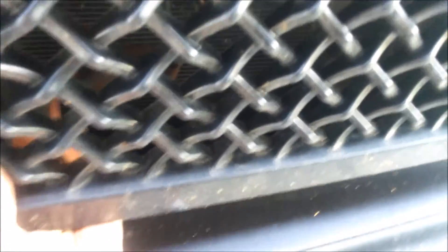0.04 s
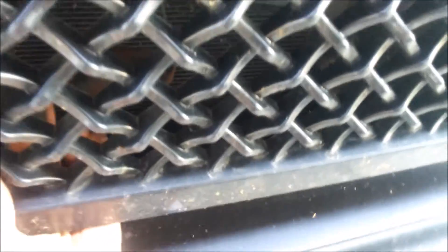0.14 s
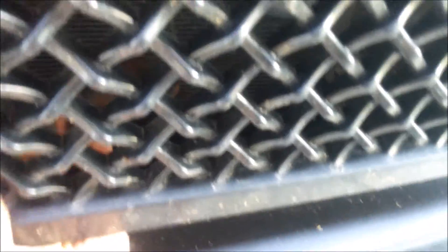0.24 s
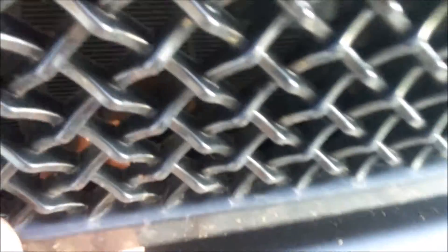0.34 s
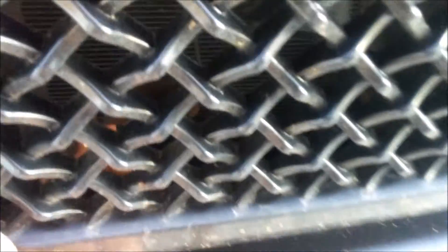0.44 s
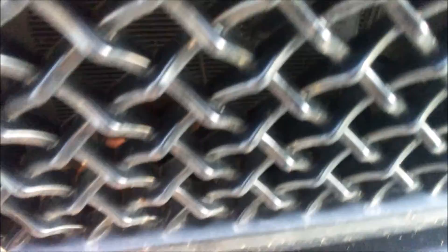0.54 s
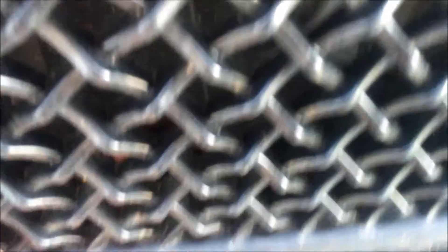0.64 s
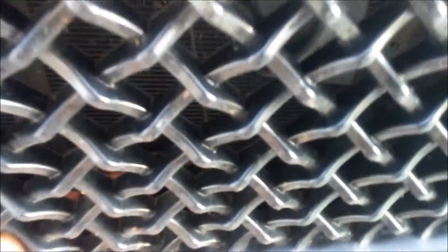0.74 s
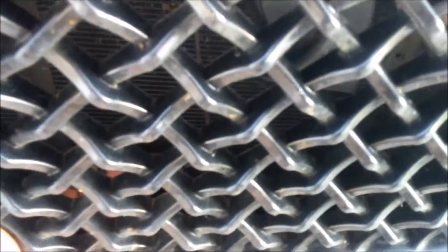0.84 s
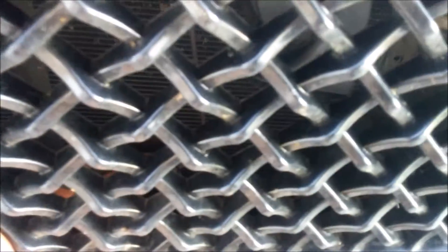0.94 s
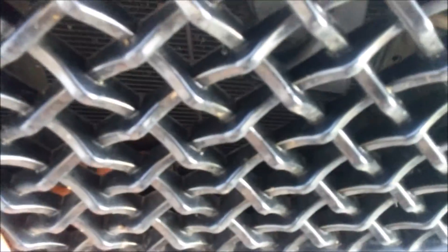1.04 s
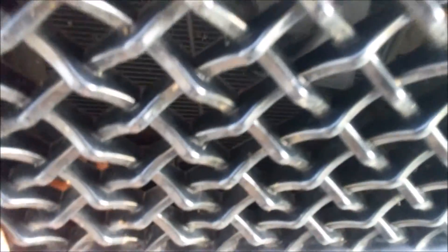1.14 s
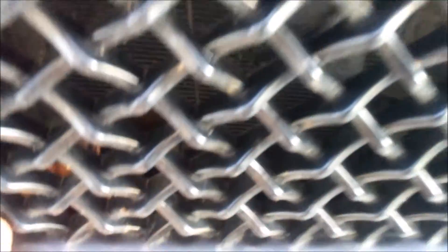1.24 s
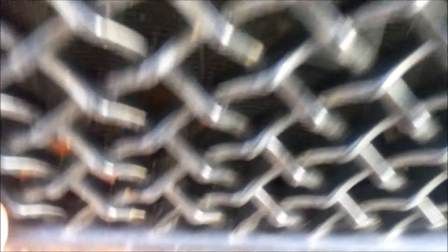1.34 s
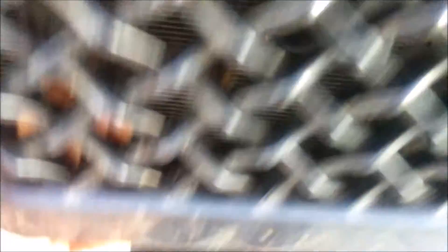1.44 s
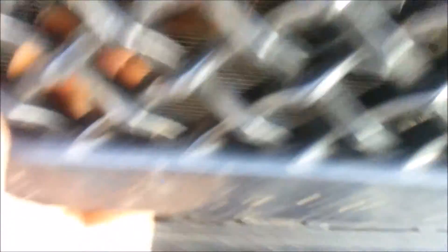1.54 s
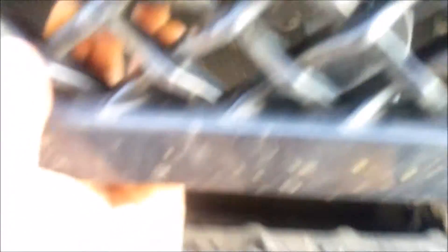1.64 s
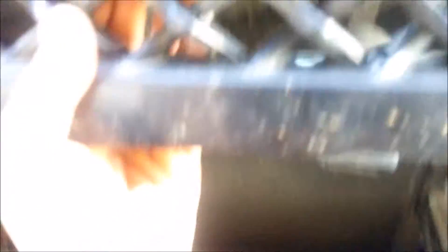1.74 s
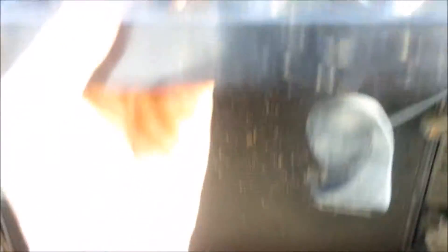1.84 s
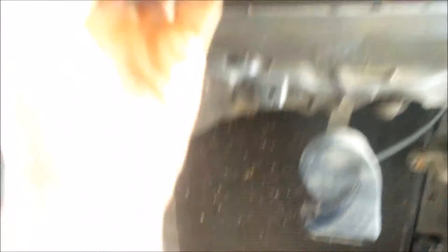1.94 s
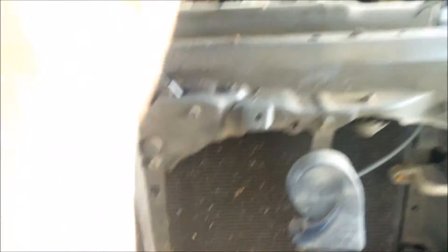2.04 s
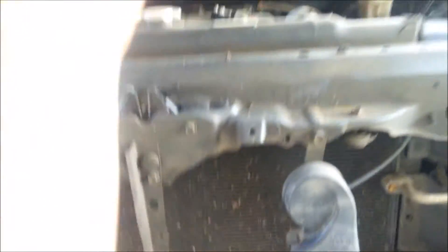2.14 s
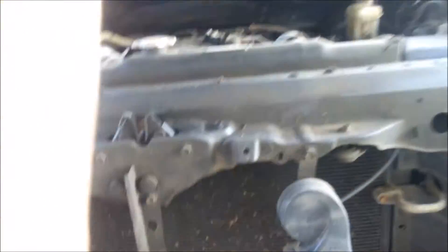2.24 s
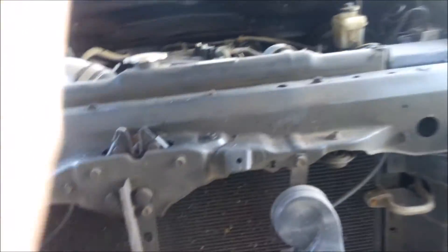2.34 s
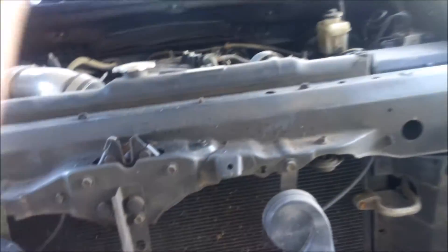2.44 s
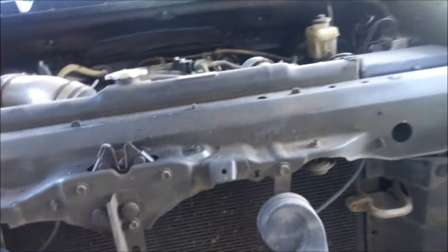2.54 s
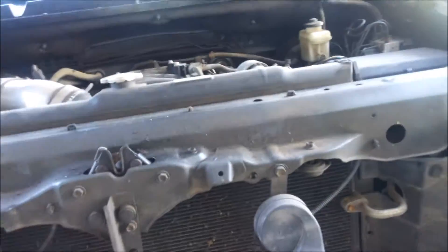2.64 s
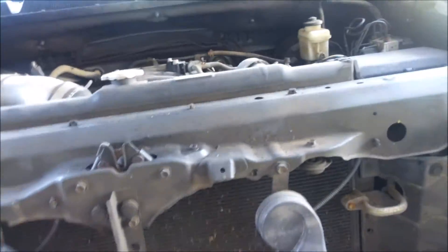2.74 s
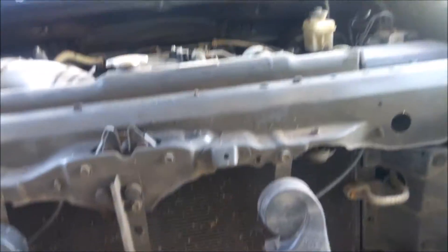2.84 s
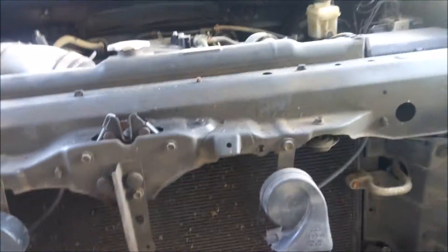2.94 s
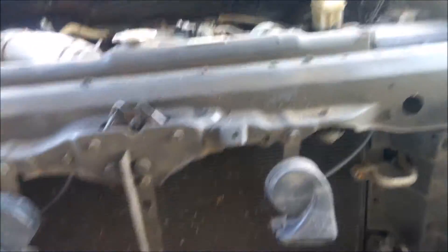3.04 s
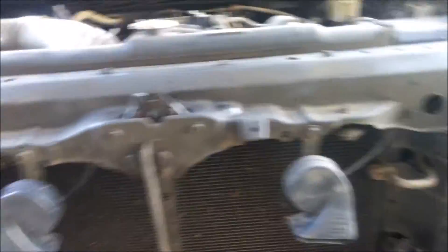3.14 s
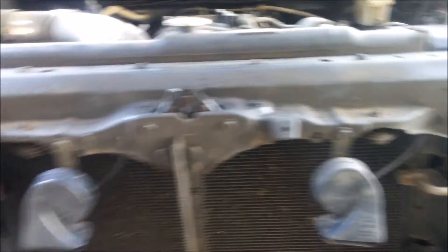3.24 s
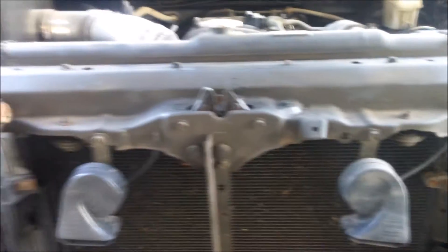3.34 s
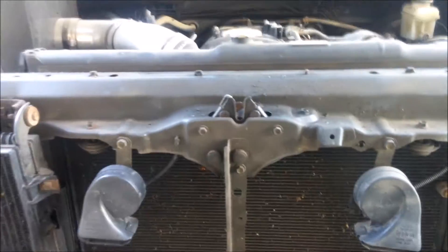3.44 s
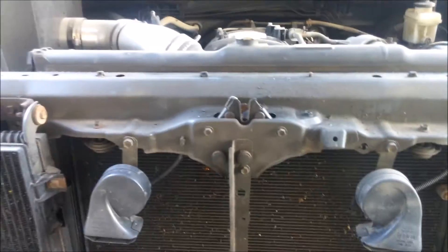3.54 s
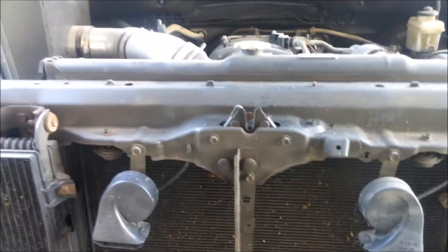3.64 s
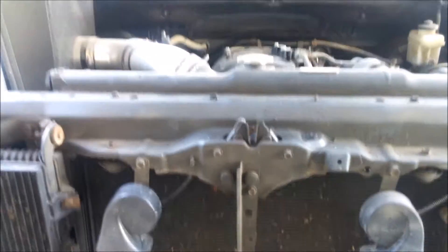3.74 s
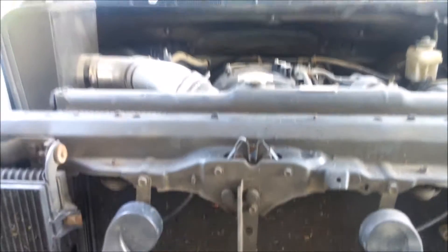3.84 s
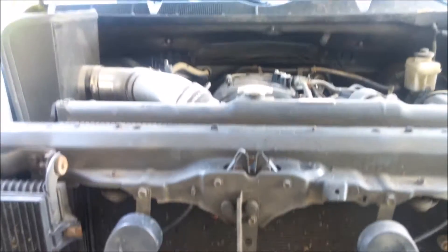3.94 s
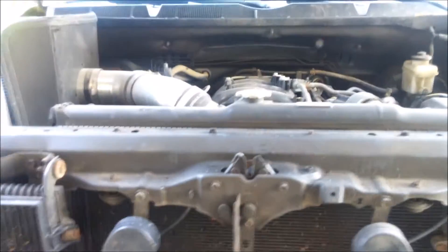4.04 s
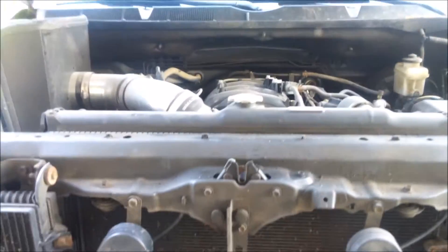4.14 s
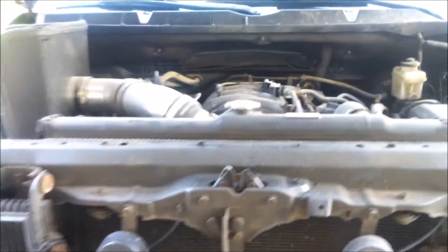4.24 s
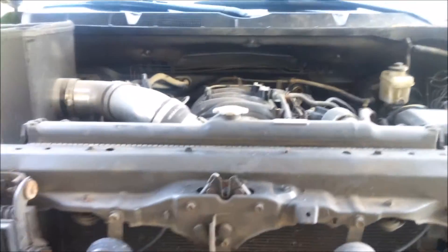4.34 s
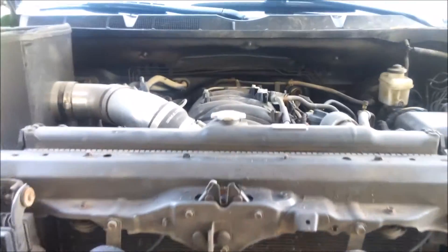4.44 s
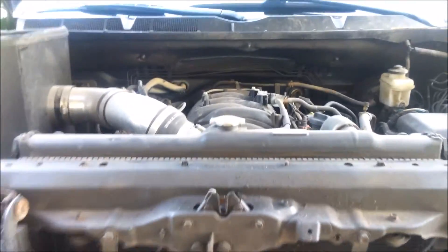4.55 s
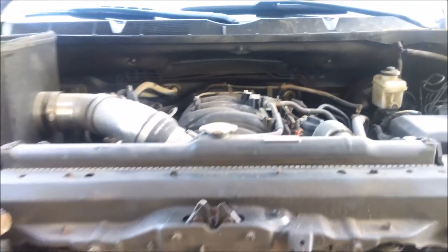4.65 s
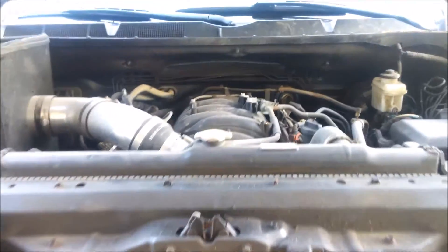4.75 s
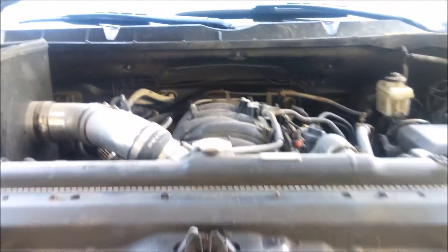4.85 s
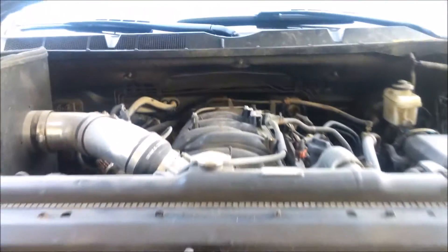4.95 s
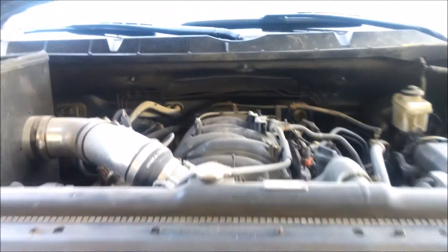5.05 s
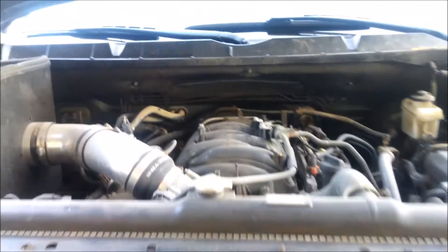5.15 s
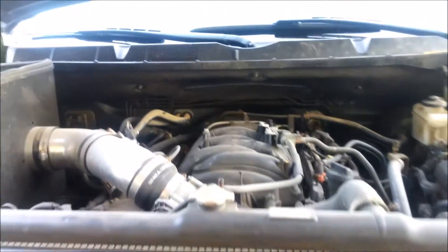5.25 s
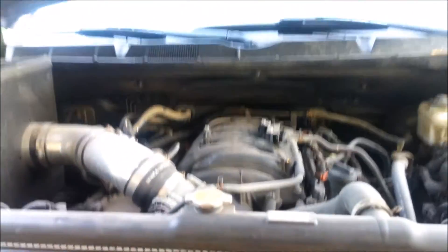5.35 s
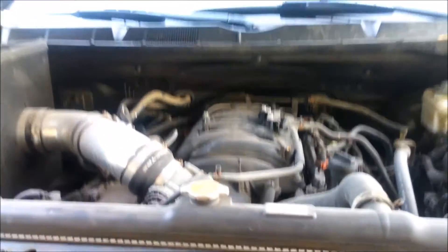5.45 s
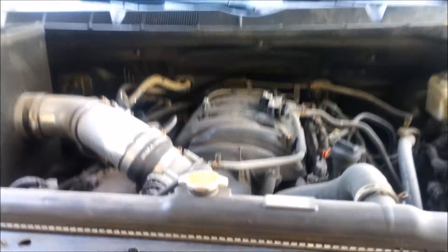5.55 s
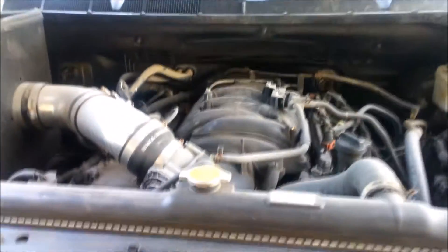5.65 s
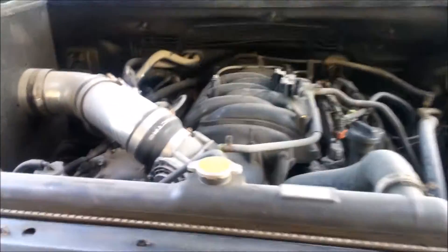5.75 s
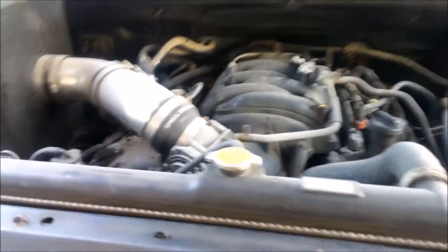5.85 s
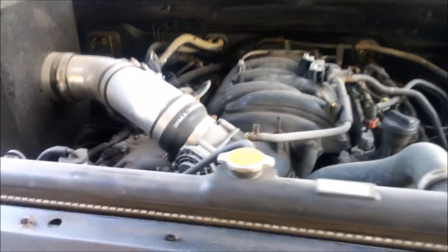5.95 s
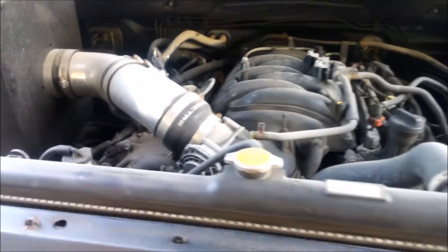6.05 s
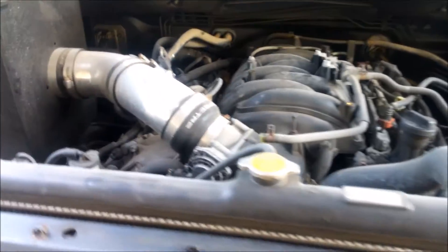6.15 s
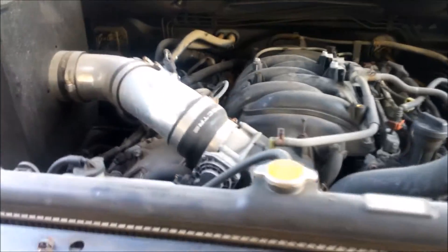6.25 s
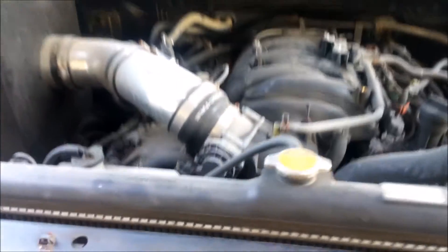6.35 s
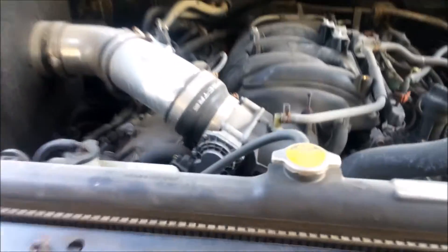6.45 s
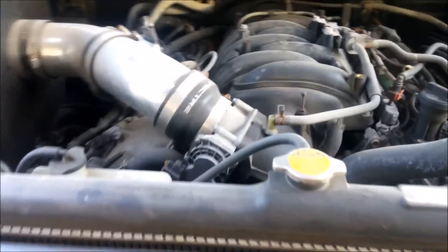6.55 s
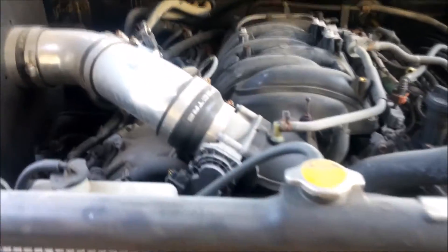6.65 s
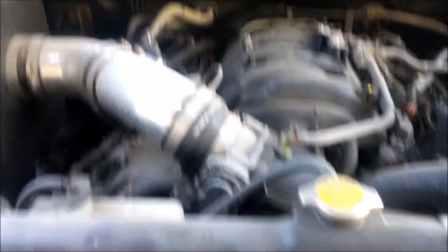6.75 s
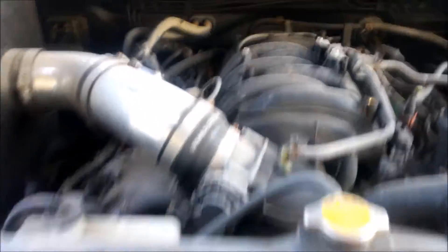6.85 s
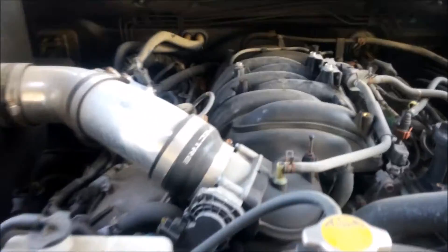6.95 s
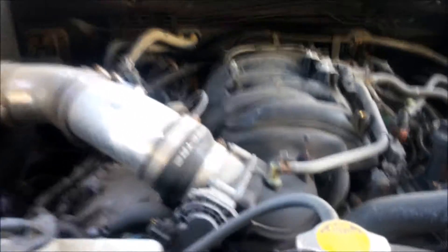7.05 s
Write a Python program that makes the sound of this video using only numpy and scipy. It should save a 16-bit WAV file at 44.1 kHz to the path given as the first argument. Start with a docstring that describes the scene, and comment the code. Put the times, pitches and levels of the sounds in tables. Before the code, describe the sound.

Small clicks and sliding steel at a hood catch, a couple of hollow thumps, then a sharp sheet-metal bang with boomy ringing. Scraping, squeals and airy hiss accompany the lift, easing into creaks and a final clunk. The sound then falls away to near silence, with rustling fingers, tiny sharp taps and far chirps, heard close on a hand-held phone outdoors.

```python
"""Outdoors, at the grille of a pickup: its hood is unlatched and lifted, heard from a hand-held phone.
The catch slides and knocks, the hood bangs free, groans and scrapes up on hissing struts and stops with a clunk;
then the hand on the phone, small ticks and far birds are left over a very quiet floor.
Blows and strain ring panel resonances; cracks, scrape, hiss, hand and floor are noise shaped in half-octave
bands; whistle is resonated noise, ticks are resonated clicks; squeaks and birds are gliding, wandering tones."""
import sys
import numpy as np
from scipy import signal
from scipy.io import wavfile

SR = 44100
rng = np.random.default_rng(int(sys.argv[2]) if len(sys.argv) > 2 else 0)


def to_wav(s):
    """Save 16-bit WAV."""
    ch = np.atleast_2d(s).T  # columns
    pcm = np.round(np.clip(ch, -1, 1) * 32767)  # PCM
    wavfile.write(sys.argv[1], SR, pcm.astype(np.int16))


N = 313551

EDGES_HZ = 25 * 2 ** np.arange(0, 9.6, .5)   # half-octave band edges
# dull rub spectrum, of groaning hood and hand: (frequency [Hz], density [dB per Hz, relative])
RUB_SHAPE = [(40, -12.5), (150, -11), (380, 4.5), (800, -16.5), (2000, -33.5)]
# metal scrape spectrum: (frequency [Hz], density [dB per Hz, relative])
SCRAPE_SHAPE = [(40, -42), (300, -8.5), (700, -6), (1200, -0.5), (2200, 0), (3400, -6), (6000, -18),
                (15000, -48.5)]


def amp(db):
    """Gain of a level in dB."""
    return 10 ** (np.asarray(db) / 20)


def rms_one(x):
    """Scaled to rms 1."""
    return x / np.sqrt(np.mean(x ** 2) + 1e-20)


def summed_db(levels):
    """Level of unrelated sounds heard together."""
    return 10 * np.log10(sum(amp(2 * db) for db in levels))


def in_time(rows):
    """Level of a (time, level) curve at every sample."""
    s, db = np.transpose(rows)
    return np.interp(np.arange(N) / SR, s, db)


def at_hz(points, hz):
    """A spectrum read on a log-frequency axis."""
    points_hz, values = np.transpose(points)
    return np.interp(np.log(hz), np.log(points_hz), values)


def drift(rate_hz):
    """Slow random signal of rms 1: noise at SR / 40 through two equal low-pass poles."""
    r = np.exp(-80 * np.pi * rate_hz / SR)
    white = rng.standard_normal(N // 40 + 2002)
    slow = signal.lfilter([1], [1, -2 * r, r * r], white)[2000:]
    return np.interp(np.arange(N) / 40, np.arange(len(slow)), rms_one(slow))


def resonance(x, hz, width_hz):
    """Two-pole peak of gain about 1."""
    r = np.exp(-np.pi * width_hz / SR)
    gain = (1 - r * r) / 2
    poles = [1, -2 * r * np.cos(2 * np.pi * hz / SR), r * r]
    return signal.lfilter([gain, 0, -gain], poles, x + 1e-18)


def placed(mid, side, alike, pan_db):
    """Left and right from two unrelated signals; positive pan is louder left."""
    alike = np.clip(alike, 0, 1)
    sign = np.array([[1], [-1]])
    pair = np.sqrt(1 + alike) * mid + sign * np.sqrt(1 - alike) * side
    return pair * amp(sign * pan_db / 2) / np.sqrt(2)


def on_truck(pair, hz):
    """Truck sounds are alike in the bass, lean left there and right in the treble around 6 kHz."""
    # (frequency [Hz], left-right likeness [0-1, clipped])
    likeness = [(60, 0.9), (180, 0.98), (550, 0.85), (1650, 0), (4970, 0.09), (15000, -5.5)]
    # (frequency [Hz], left over right [dB])
    tilt = [(60, 1), (150, 2), (380, 2), (950, 0.5), (2380, -4), (5980, -9), (15000, 2)]
    return placed(*pair, at_hz(likeness, hz), at_hz(tilt, hz))


def bands():
    """Half-octave bands of two unrelated noises, each with its centre."""
    white = rng.standard_normal((2, 2, N))
    for k, (low, high) in enumerate(zip(EDGES_HZ, EDGES_HZ[1:])):
        sos = signal.butter(2, [low, high], "band", fs=SR, output="sos")
        yield np.sqrt(low * high), signal.sosfilt(sos, white[k % 2])


def unit(spectrum, hz):
    """Band gain that gives a spectrum a total rms of 1."""
    centres = np.sqrt(EDGES_HZ[1:] * EDGES_HZ[:-1])
    total = np.sum(amp(at_hz(spectrum, centres)) ** 2 * np.diff(EDGES_HZ)) / (SR / 2)
    return amp(at_hz(spectrum, hz)) / np.sqrt(total)


def grains(per_s, spread_db):
    """Two unrelated streams of clicks of uneven size at shared random moments, rms 1."""
    size_db = spread_db * np.minimum(rng.exponential(1, (2, N)), 5)
    sizes = amp(size_db) * rng.standard_normal((2, N))
    return rms_one(sizes * (rng.random(N) < per_s / SR))


def tones(notes, blur, lean_db):
    """Gliding narrow tones whose strength and phase wander; blur is their width as a share of pitch."""
    out = np.zeros((2, N))
    lean = np.array([[lean_db], [-lean_db]]) / 2
    for s, length_s, start_hz, end_hz, db in notes:
        n, i = round(length_s * SR), round(s * SR)
        r = np.exp(-np.pi * blur * start_hz / SR)
        wander = rng.standard_normal((2, n + 4000)) + 1j * rng.standard_normal((2, n + 4000))
        wander = signal.lfilter([1], [1, -2 * r, r * r], wander)[:, -n:]
        phase = 2 * np.pi * np.cumsum(np.linspace(start_hz, end_hz, n)) / SR
        note = rms_one(np.real(wander * np.exp(1j * phase)))
        envelope = signal.windows.tukey(n, .55) * np.linspace(1.4, .5, n)
        out[:, i:i + n] += amp(db + lean) * note * envelope
    return out


def quiet_floor():
    """Steady, wide background noise, nearly unrelated left and right."""
    # (frequency [Hz], density [dB per Hz, relative])
    spectrum = [(30, -23), (60, -10.5), (200, -17), (400, -23.5), (1000, -22.5), (1700, -31), (2400, -26.5),
                (3400, -34), (11500, -35.5), (15600, -49)]
    return sum(placed(*pair, 0.089, 0) * amp(-74) * unit(spectrum, hz) for hz, pair in bands())


def hiss_bands():
    """Narrow bands of hiss that swell and fade: very blurred tones."""
    # (start [s], length [s], start pitch [Hz], end pitch [Hz], level before envelope [dB])
    notes = [(.58, 0.46, 2230, 2180, -59), (1.27, 0.1, 2140, 2160, -64), (2.2, 0.97, 2166, 2165, -64),
             (3.35, 0.69, 2227, 2116, -62), (3.75, 0.57, 2195, 2128, -72), (3.8, 0.5, 482, 451.8, -70),
             (5.62, 0.63, 5240, 5000, -79.5), (5.45, 1.48, 2266, 2200, -75), (5.75, .4, 1550, 1435, -72)]
    return tones(notes, blur=0.14, lean_db=-4.0)


def low_tone():
    """A faint low tone, gliding slightly down."""
    # (start [s], length [s], start pitch [Hz], end pitch [Hz], level before envelope [dB])
    notes = [(6.2, 0.8, 353, 335, -71.5)]
    return tones(notes, blur=0.077, lean_db=2.5)


def thin_tones():
    """Faint thin high tones, perhaps insects: the narrowest blur."""
    # (start [s], length [s], start pitch [Hz], end pitch [Hz], level before envelope [dB])
    notes = [(5.49, 0.13, 3690, 3650, -80), (5.88, 0.49, 3670, 3662, -78.5), (6.3, .65, 4290, 4240, -87)]
    return tones(notes, blur=0.019, lean_db=-4)


def far_birds():
    """Far birds: short gliding calls, equally loud left and right."""
    # (start [s], length [s], start pitch [Hz], end pitch [Hz], level before envelope [dB])
    notes = [(5.345, 0.12, 2760, 2640, -71), (5.42, .12, 2660, 2460, -70.5),
             (5.375, 0.033, 2530, 2037, -69.5), (5.5, 0.099, 3210, 3246, -70.5),
             (5.83, 0.066, 3000, 3150, -73.5), (6.15, 0.12, 2760, 2900, -72.5),
             (6.28, 0.058, 3100, 2930, -65.5), (6.33, 0.11, 2760, 2567, -71.5),
             (6.77, .07, 2930, 2960, -64.5), (6.8, 0.13, 2790, 2844, -68.5),
             (6.9, 0.047, 2970, 3020, -67.5), (6.94, 0.089, 2866, 2566, -71.5)]
    return tones(notes, blur=0.058, lean_db=0.0)


def hand_levels():
    """Rub, rustle and bright rustle levels: each move swells, then fades."""
    # hand shifting on the phone: (start [s], rise [s], fade [s], dull rub [dB], rustle [dB], bright rustle [dB])
    moves = [(4.521, 0.019, 0.31, -57, -57.5, -59), (4.62, 0.098, 0.09, -77.5, -59.5, -81),
             (4.77, 0.03, 0.11, -56.5, -72.5, -91), (5.08, 0.031, 0.18, -80.5, -63.5, -65.5),
             (5.6, 0.31, .6, -73, -63, -78), (5.9, 0.099, 0.26, -65.5, -61, -74.5),
             (6.2, 0.32, .2, -74, -88, -95.5), (6.571, 0.033, 0.32, -55.5, -62, -68),
             (7.02, 0.023, 0.35, -61, -64, -79.5), (7.06, 0.037, 0.14, -68.5, -56.5, -64.5)]
    rest_db, drop_per_fade_db = -83, 28.5
    t = np.arange(N) / SR
    resting = np.interp(t, [4.4, 4.5], [-120, rest_db])   # from the end of the hood's strain
    levels = [np.tile(resting, (3, 1))]
    for s, rise_s, fade_s, *peaks in moves:
        times = [s - .01, s, s + rise_s, s + rise_s + 3 * fade_s]
        shape = np.interp(t, times, [-100, -20, 0, -3 * drop_per_fade_db])
        levels.append(np.array(peaks)[:, None] + shape)
    return summed_db(levels)


def hand():
    """The hand on the phone: dull, middle and bright friction noise, each band wavering."""
    # (frequency [Hz], density [dB per Hz, relative])
    rustle_shape = [(300, -61), (900, 3.5), (1500, 0), (2250, 7), (3500, -22), (8000, -20)]
    # (frequency [Hz], density [dB per Hz, relative])
    bright_shape = [(1500, -50), (4000, 8.5), (7000, -7), (15500, -14)]
    levels = hand_levels()
    out = np.zeros((2, N))
    for hz, pair in bands():
        shapes = [RUB_SHAPE, rustle_shape, bright_shape]
        energy = sum((amp(db) * unit(shape, hz)) ** 2 for db, shape in zip(levels, shapes))
        out += placed(*pair, 0.089, 0) * np.sqrt(energy) * amp(2.0 * drift(15))
    return out


def ticks():
    """Ticks and bumps near the phone: a click with a dying noise tail, three times through one resonance."""
    # (time [s], peak before panning [dB], centre [Hz], nominal width [Hz], tail t60 [s], left over right [dB])
    rows = [(3.589, -43.5, 111, 200, 0.15, 1), (3.621, -46.5, 149, 150, 0.15, 1.5),
            (3.65, -44.5, 160.6, 149, 0.31, 1.5), (3.728, -43.5, 199.5, 398, 0.08, 8),
            (3.751, -40.5, 153, 200, 0.25, 5), (3.81, -42.5, 118, 198, 0.19, 2),
            (3.931, -54.5, 488, 200, 0.088, 3.5), (3.991, -54.5, 479, 199.8, .15, 4),
            (4.53, -41, 80, 150.4, 0.093, -3.5), (4.788, -48.5, 492, 696, 0.031, 14),
            (4.82, -56, 601, 701, 0.059, 12.5), (4.95, -55.5, 73, 99, 0.054, -8.5),
            (5.076, -36.5, 1910, 2080, 0.11, -4.5), (5.086, -40, 3500, 3977, 0.093, -6.5),
            (5.902, -38, 2156, 1890, 0.024, 0), (5.983, -34, 1450, 1390, 0.02, 1),
            (6.375, -61.5, 89.5, 79.9, 0.11, 0.5), (6.6, -58, 80.2, 79.5, 0.097, 0)]
    out, t = np.zeros((2, N)), np.arange(SR // 4) / SR
    noise = rng.standard_normal((len(rows), 2, len(t)))
    for (s, db, hz, width_hz, t60, pan_db), pair in zip(rows, noise):
        burst = pair * amp(-60 * t / t60)
        burst[0, 0] += 0.23 * np.sqrt(SR * t60)
        for _ in range(3):
            burst = resonance(burst, hz, 0.97 * width_hz)
        i = round(s * SR)
        burst = burst / np.abs(burst[0]).max() * amp(db)
        out[:, i:i + len(t)] += placed(*burst, 0.7, pan_db)
    return out


def strokes():
    """Groan, scrape, whistle, hiss levels: each stroke rises, sags and lets go, over the steady strain."""
    # strokes of groan, scrape, whistle and hiss, some only a groan after a blow:
    # (start [s], length [s], hood groan [dB], metal scrape [dB], whistle [dB], hiss [dB])
    rows = [(0.01, 0.076, -58, -48, -72, -77), (0.067, 0.12, -60, -55.5, -61, -65),
            (0.376, 0.077, -42, -43.5, -38.5, -61), (0.436, 0.1, -69, -62.5, -52.5, -75),
            (0.499, 0.087, -60, -44.5, -41, -50.5), (0.717, 0.11, -43.5, -79, -66, -82),
            (0.797, 0.1, -46.5, -56, -50, -71), (1.104, .115, -47, -63, -82, -86),
            (1.394, .13, -39, -37.5, -36, -40.5), (1.776, 0.08, -62, -41, -37, -43),
            (1.862, 0.344, -41.5, -39.5, -44.5, -44.5), (2.492, 0.082, -38, -44, -43, -45),
            (2.663, 0.13, -40, -47.5, -46, -44.5), (3.304, 0.16, -48.5, -49.5, -56.5, -78),
            (3.576, 0.25, -56.5, -76, -59.5, -89)]
    # steady strain of the hood between strokes: (time [s], groan [dB])
    strain = [(0, -60.5), (.6, -53.5), (1.2, -61), (1.34, -68.5), (1.6, -34.5), (1.78, -43), (2.23, -52),
              (3.17, -53.5), (3.5, -56.5), (3.9, -64), (4.45, -84), (4.5, -120)]
    # gas struts extending: (time [s], hiss [dB])
    struts = [(0, -72), (1.38, -77), (1.5, -56), (1.68, -49.5), (1.78, -50), (2.2, -47), (2.23, -53),
              (2.9, -50), (3.04, -55.5), (3.17, -84), (4.45, -93), (4.5, -120)]
    attack_s, release_s, sag_db = 0.032, 0.01, 4.5
    scrape_under_db, whistle_under_db = 7.5, 10.5   # below the groan
    t = np.arange(N) / SR
    strain_db = in_time(strain)
    steady = [strain_db, strain_db - scrape_under_db, strain_db - whistle_under_db, in_time(struts)]
    levels = [np.array(steady)]
    for s, length_s, *peaks in rows:
        end = s + length_s
        times = [s - attack_s, s, s + attack_s, end, end + release_s, end + 4 * release_s]
        shape = np.interp(t, times, [-100, -20, 0, -sag_db, -20, -100])
        levels.append(np.array(peaks)[:, None] + shape)
    return summed_db(levels)


def slips(hiss_db, count):
    """Many brief gliding squeaks at random moments of the lift, their level following the strut hiss."""
    draws = rng.random((count, 4))
    s, length_s = 1.62 + 1.42 * draws[:, 0], .03 + .07 * draws[:, 1]
    start_hz = 5600 * 1.9 ** draws[:, 2]
    end_hz = start_hz * (1 + .14 * (draws[:, 3] - .4))
    level_db = hiss_db[(s * SR).astype(int)] - 13
    return tones(zip(s, length_s, start_hz, end_hz, level_db), blur=0.027, lean_db=-8.5)


def squeaks():
    """Squeaks of hinges and catch: blurred gliding tones."""
    # (start [s], length [s], start pitch [Hz], end pitch [Hz], level before envelope [dB])
    notes = [(.82, 0.04, 5500, 5840, -52.5), (1.503, 0.032, 4450, 4670, -34.5),
             (1.82, 0.071, 3470, 3300, -40), (1.935, 0.053, 2880, 2880, -40.5),
             (2.005, .05, 2550, 2700, -42), (2.04, 0.06, 3040, 3160, -45), (2.08, 0.13, 3550, 3010, -45),
             (2.24, 0.28, 1150, 1120, -56), (2.32, 0.077, 5800, 5860, -55), (2.47, 0.11, 1060, 945, -45),
             (2.5, 0.091, 8500, 8900, -43), (2.55, 0.054, 4800, 4800, -45.5),
             (2.69, 0.048, 2080, 2050, -53), (2.49, 0.098, 448, 428, -70), (2.685, 0.12, 790, 797, -43),
             (2.66, 0.13, 1150, 1100, -43.5), (2.68, 0.092, 480, 463, -45), (2.84, 0.11, 8300, 9950, -48.5),
             (3.05, 0.22, 1220, 1160, -62), (3.32, 0.13, 2800, 2700, -48.5), (3.7, 0.14, 3220, 3180, -63)]
    return tones(notes, blur=.06, lean_db=-4.5)


def whistle(level_db):
    """Sliding steel: noise through fixed resonances, each wavering."""
    # (centre [Hz], width of each of two passes [Hz], relative level [dB])
    peaks = [(4850, 1500, -3), (5750, 850, 0)]
    white, out = rng.standard_normal((2, N)), np.zeros((2, N))
    for hz, width_hz, db in peaks:
        peak = resonance(resonance(white, hz, width_hz), hz, width_hz)
        out += on_truck(peak, hz) * amp(db + 3.0 * drift(5)) / np.sqrt(width_hz)
    return rms_one(out) * amp(level_db)


def contact_power():
    """Power fed into the hood in bass, middle, treble: contacts build up fast, chatter unevenly, die out."""
    # blows on the hood: (time [s], middle drive [dB], bass drive [dB], treble drive [dB], power decay [s])
    blows = [(0, -25, -49.5, -41, 0.012), (0.033, -23, -55, -51, .006), (0.057, -27.5, -51, -52, 0.01),
             (0.134, -28, -54.5, -63, 0.0052), (0.238, -38.5, -51, -56, 0.0079),
             (0.306, -34.5, -68, -65, 0.0047), (0.352, -44, -47, -67, 0.011),
             (0.385, -30, -58, -58, 0.0069), (0.403, -38, -60, -35, 0.0017), (0.52, -41, -56.5, -39, 0.014),
             (0.657, -26, -31.5, -41.5, 0.014), (0.67, -18.5, -25.5, -27, 0.0042),
             (0.682, -29, -25, -46, 0.0014), (0.892, -32, -67, -48, 0.0028), (0.98, -25, -26.5, -42, 0.012),
             (1.061, -35, -33, -62, 0.0064), (1.091, -35, -39, -45, 0.0059), (1.357, -53, -77, -52, 0.0024),
             (1.372, -46, -71, -36.5, 0.0047), (1.388, -25.5, -39, -20.5, 0.006),
             (1.422, -23, -39.5, -20.5, 0.0056), (1.465, -39, -38.5, -31, .005),
             (1.473, -26, -33, -37, 0.0028), (1.525, -4, -29.5, -14, 0.015),
             (1.538, -21, -9.5, -32, 0.0032), (1.578, -12.5, -24, -23.5, 0.009),
             (1.594, -14.5, -24.5, -16.5, 0.0074), (1.61, -11.5, -24, -41, 0.0055),
             (1.639, -22, -29, -42.5, 0.0047), (1.817, -49, -69, -29.5, 0.011),
             (1.867, -30, -40, -31, 0.003), (1.875, -26, -47, -40, 0.0032), (1.915, -30, -52, -48, 0.0021),
             (1.997, -31.5, -72, -42, 0.0052), (2.043, -34, -58, -35, 0.003),
             (2.121, -39, -57, -46, 0.0074), (2.247, -43.5, -77, -57, 0.0071),
             (2.334, -47, -62, -60, 0.0034), (2.472, -45, -57, -47.5, 0.012), (2.701, -29, -59, -65, 0.007),
             (3.053, -51.5, -62, -64, .005), (3.189, -29, -20.5, -71, 0.0038),
             (3.204, -17, -63, -57, 0.019), (3.259, -29.5, -51, -40, 0.011), (3.297, -40, -40, -56, 0.015)]
    power, t = np.zeros((3, N)), np.arange(N // 8) / SR
    for s, db, bass_db, treble_db, decay_s in blows:
        i = round(s * SR)
        burst = (1 - np.exp(-t / 0.0024)) * np.exp(-t / decay_s)
        power[:, i:i + len(t)] += amp(2 * np.array([[bass_db], [db], [treble_db]])) * burst
    return power * amp(2 * 2.5 * drift(90))


def share(power, hz):
    """Blend of contact powers at a frequency; dull blows keep falling toward the top."""
    bass, middle, treble = np.log(power + 1e-30)
    upper = middle + 0.52 * (treble - middle)
    top = treble + 0.18 * (treble - middle) + 2.1
    centres = np.log([150, 900, 2400, 4200, 12000])
    weights = [np.interp(np.log(hz), centres, row) for row in np.eye(5)]
    return np.exp(np.dot(weights, [bass, middle, upper, treble, top]))


def crack_power(power, hz):
    """Dense sheet-metal modes: a band's blow power, smoothed at onset and ringing down."""
    # (frequency [Hz], density [dB per Hz, relative])
    spectrum = [(40, -12.5), (100, -6), (340, -2.5), (1000, -19), (2060, -4.5), (3500, -12), (6500, -18),
                (11000, -41), (15500, -61.5)]
    # (frequency [Hz], t60 [s])
    ring_t60 = [(60, 0.52), (300, 0.33), (1000, 0.022), (3000, 0.019), (12000, 0.026)]
    r = amp(-120 / (at_hz(ring_t60, hz) * SR))   # power decay per sample
    ringing = signal.lfilter([.005], [1, -r], share(power, hz))
    onset = np.exp(-3 * hz / SR)   # a band needs part of a cycle to build up
    ringing = signal.lfilter([1 - onset], [1, -onset], ringing)
    return ringing * (unit(spectrum, hz) * amp(8.5 + 0.39 * drift(36))) ** 2


def hood_noise(power, groan_db, scrape_db, hiss_db):
    """Crack of the blows, rub, gritty scrape and strut hiss: powers added band by band."""
    # strut hiss: (frequency [Hz], density [dB per Hz, relative])
    hiss_shape = [(500, -29.5), (2000, -9), (4000, -8), (8600, -4.5), (11500, -3), (13000, -18.5),
                  (15500, -22.5)]
    out, together = np.zeros((2, N)), drift(25)
    catches = np.abs(grains(350, spread_db=1.2)[0])   # grit catches the metal and lets go, 3 ms decay
    grit = rms_one(.08 + signal.lfilter([.01], [1, -np.exp(-1 / (.003 * SR))], catches))
    for hz, pair in bands():
        crack = crack_power(power, hz)
        rub = amp(groan_db - 4.5 + 2.5 * drift(15)) * unit(RUB_SHAPE, hz)
        stutter_db = 1.5 * together + 2.5 * drift(40)
        scrape = grit * amp(scrape_db + stutter_db) * unit(SCRAPE_SHAPE, hz)
        hiss = amp(hiss_db + 0.85 * drift(36)) * unit(hiss_shape, hz)
        out += on_truck(pair * np.sqrt(crack + rub ** 2 + scrape ** 2 + hiss ** 2), hz)
    return out


def hood(power, groan_db, scrape_db):
    """Blows and the strain of lifting ring the panel modes, each with a changing strength."""
    # hood panels: (frequency [Hz], drive gain [dB], t60 [s])
    modes = [(70, -3.5, 0.17), (96, -14, 0.39), (118, 0, 0.35), (170, -9.5, 0.75), (185.3, 3, 0.24),
             (282.4, -0.5, 0.7), (326.4, -3.5, 0.18), (373, -3.5, 0.44), (438, -5, 0.15), (496, -8, 0.86),
             (528.1, -16.5, 0.22), (642, -19, .2), (860, -13, 0.031), (1020.3, -8.5, 0.065),
             (1111.6, -7.5, 0.11), (1224, -9.5, 0.05), (1270, -13.5, 0.042), (1325, -12.5, 0.088),
             (1690, -19, 0.49), (2070, -6, 0.07), (2310, -12, 0.034)]
    blow_gain_db, strain_gain_db = 25.5, 19.5
    out = np.zeros((2, N))
    force = [grains(6000, spread_db=-1.5), grains(6000, spread_db=3.0)]
    for k, (hz, db, t60) in enumerate(modes):
        groan = amp(groan_db + at_hz(RUB_SHAPE, hz))
        scrape = amp(scrape_db + at_hz(SCRAPE_SHAPE, hz) + 3.5)
        blow = np.sqrt(share(power, hz)) * amp(blow_gain_db)
        drive = blow + (groan + scrape) * amp(strain_gain_db)
        drive = drive * amp(db + 3.0 * drift(20))
        width_hz = np.log(1000) / np.pi / t60
        out += on_truck(resonance(force[k % 2] * drive, hz, width_hz), hz)
    # low-pass keeps the panel ringing dull
    return signal.sosfilt(signal.butter(2, 3200, fs=SR, output="sos"), out)


def scene():
    """All sources, background first."""
    groan_db, scrape_db, whistle_db, hiss_db = strokes()
    power = contact_power()
    far = quiet_floor() + hiss_bands() + low_tone() + thin_tones() + far_birds()
    near = hand() + ticks()
    truck = slips(hiss_db, count=110) + squeaks() + whistle(whistle_db)
    truck += hood_noise(power, groan_db, scrape_db, hiss_db) + hood(power, groan_db, scrape_db)
    return far + near + truck


def record(dry):
    """The microphone drops deep bass and dips near 12.5 kHz; peaks are rounded, the top cut, an offset added."""
    cutoff_hz, ceiling, offset = 15750, .95, -.0007
    heard = signal.sosfilt(signal.butter(2, 45, "high", fs=SR, output="sos"), dry)
    heard = heard - 0.78 * resonance(heard, 12600, 2000)
    rounded = ceiling * np.tanh(heard / ceiling)
    steep = signal.ellip(12, .5, 80, cutoff_hz, fs=SR, output="sos")
    return signal.sosfilt(steep, rounded) + offset


dry = scene()
out = record(dry)
to_wav(out)
```